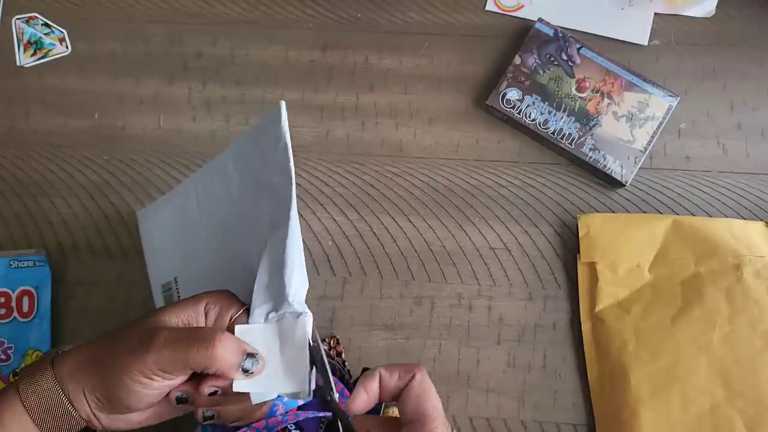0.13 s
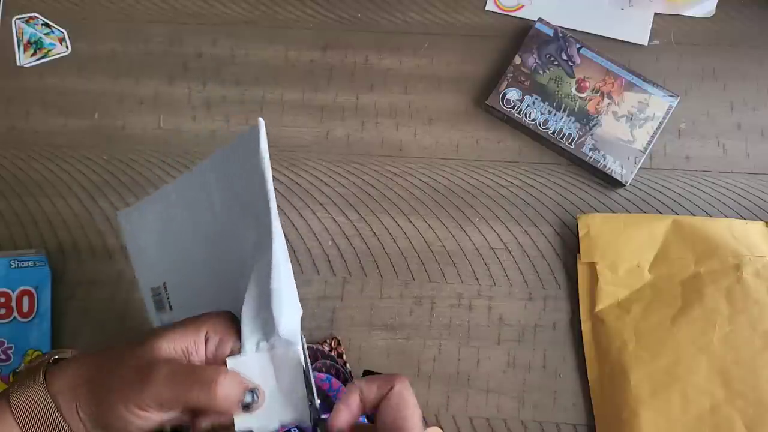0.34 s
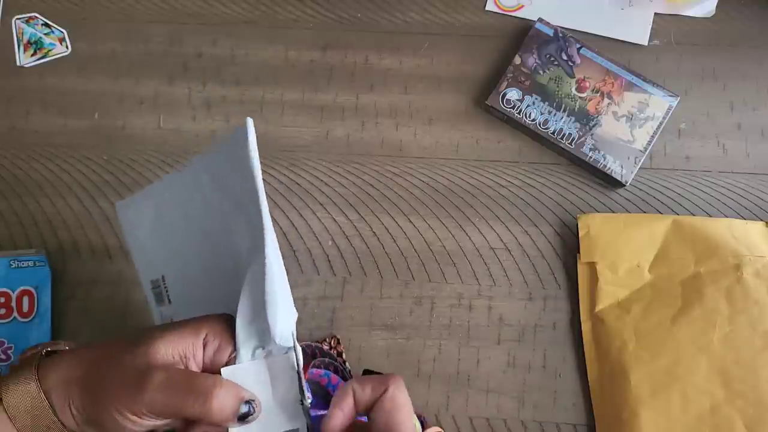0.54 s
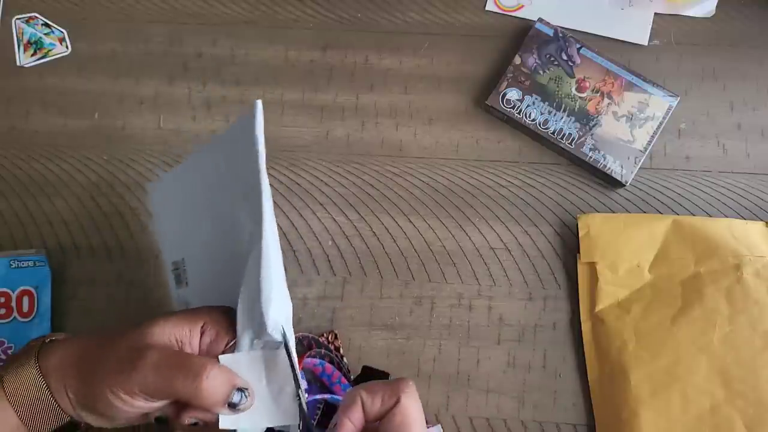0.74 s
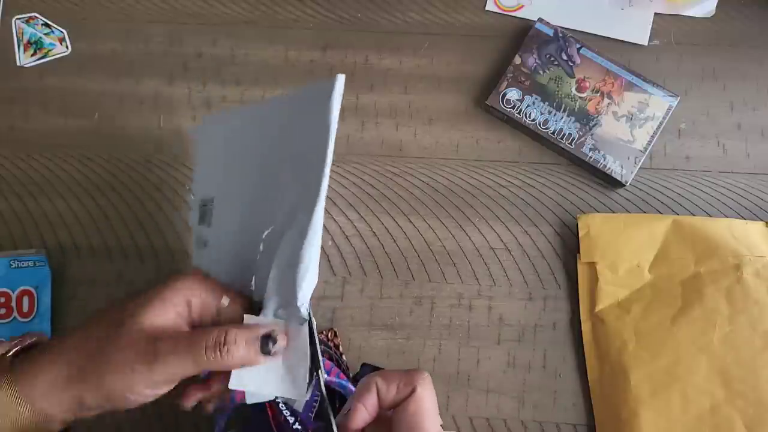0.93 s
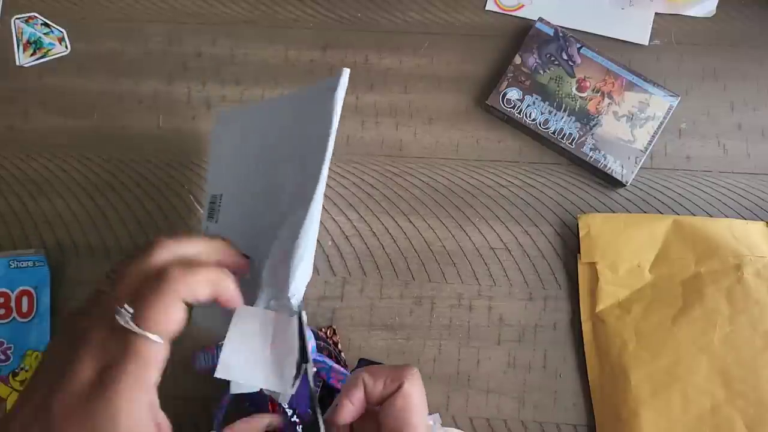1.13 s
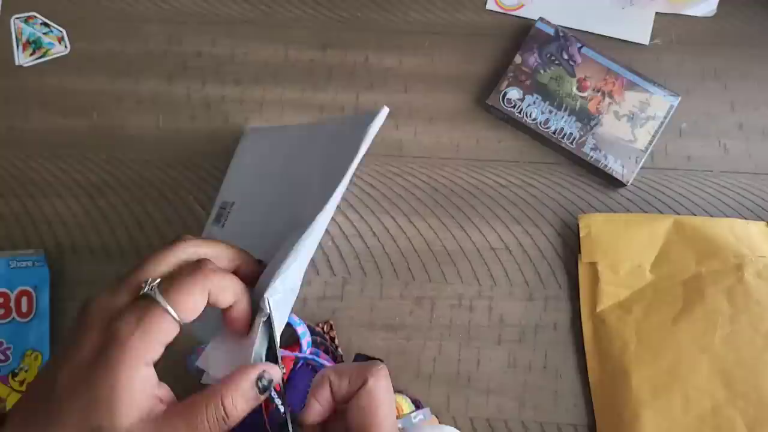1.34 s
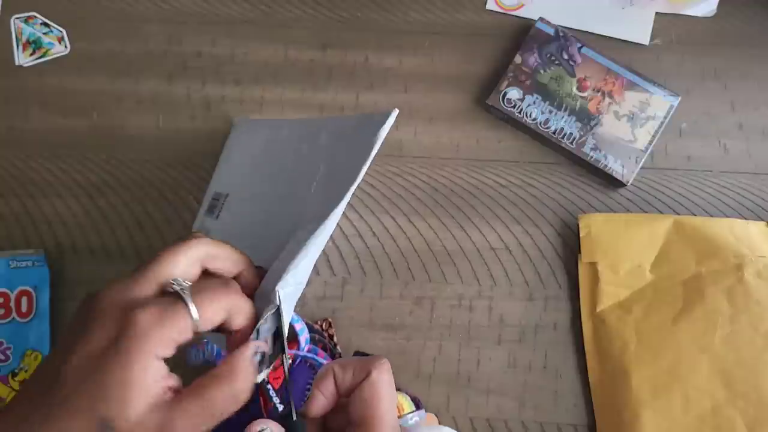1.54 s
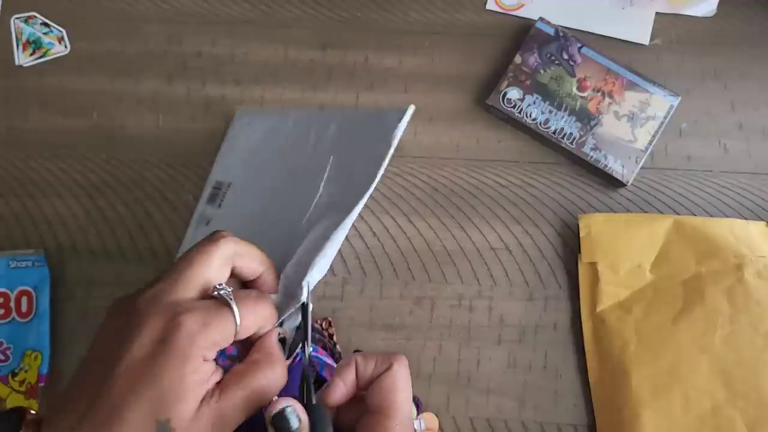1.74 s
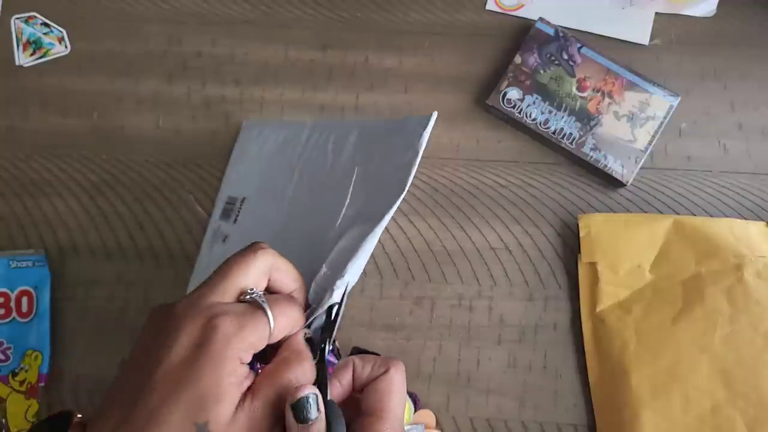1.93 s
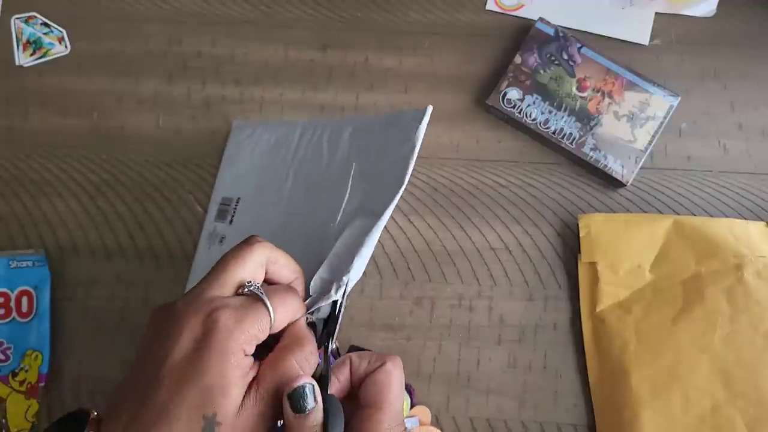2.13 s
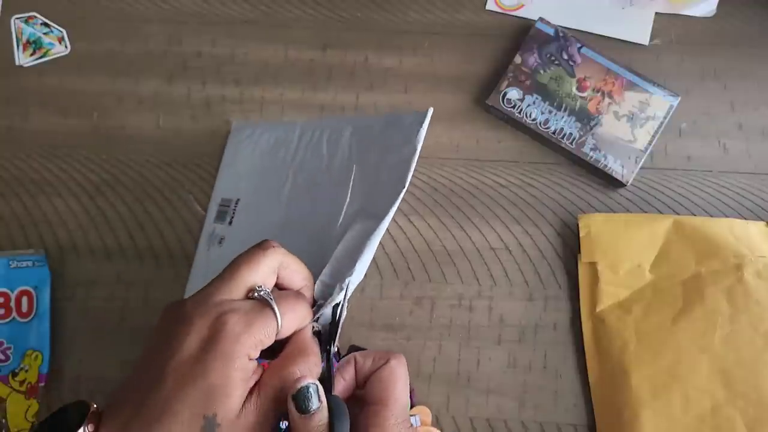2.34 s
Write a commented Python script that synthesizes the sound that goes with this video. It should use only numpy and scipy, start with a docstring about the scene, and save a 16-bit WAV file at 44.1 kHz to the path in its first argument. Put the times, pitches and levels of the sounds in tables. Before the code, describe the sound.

A plastic envelope crackles and snaps close up as scissors snip along its edge.

```python
"""Sharp plastic snaps and a fine crackle, close up: scissors cutting the edge of a padded mailer.
The film buckles and pops, and each snap rings the hollow envelope. Between snaps it slides against
blades and fingers; the padding rubs and knocks dully, and late on the blades clack as they close.
A small room with a low hum answers."""
import sys
import numpy as np
from scipy import signal
from scipy.fft import rfft, irfft
from scipy.io import wavfile
from scipy.ndimage import uniform_filter1d

SR = 44100
rng = np.random.default_rng(int(sys.argv[2]) if len(sys.argv) > 2 else 0)


def waveform_to_disk(signal):
    """Save audio, clipped to [-1, 1], as 16-bit WAV at the path in sys.argv[1]."""
    frames = np.transpose(np.atleast_2d(signal))
    scaled = np.clip(frames, -1, 1) * 32767
    samples = np.round(scaled).astype(np.int16)
    wavfile.write(sys.argv[1], SR, samples)


N = 105840
LEAD_S = 0.006  # pre-roll ahead of each snap and clack
ATTACK_SAMPLES = 135  # the first 3 ms of a hit set its level


def amp(db):
    """Decibels to gain."""
    return 10 ** (np.asarray(db) / 20)


def unit(x):
    """Scales to rms 1."""
    return x / np.sqrt(np.mean(x ** 2) + 1e-20)


def curve(points, hz):
    """Reads a table on a log-frequency axis."""
    f, value = np.transpose(points)
    return np.interp(np.log(hz + 1), np.log(f + 1), value)


def add(mix, s, sound):
    """Drops a stereo sound into the mix at time s."""
    part = mix[:, max(round(s * SR), 0):][:, :sound.shape[1]]
    part += sound[:, :part.shape[1]]


def pan(lr_db):
    """Left and right gains; positive leans left."""
    return amp(np.array([[lr_db], [-lr_db]]) / 2)


def pair(x, likeness):
    """Narrows two unrelated channels: likeness 0 is wide, 1 is mono."""
    c = np.clip(likeness, -1, 1)
    return np.array([x[0], c * x[0] + np.sqrt(1 - c ** 2) * x[1]])


def colour(x, eq, size=2048):
    """Minimum-phase EQ, so attacks stay crisp."""
    log_gain = np.log(amp(curve(eq, abs(np.fft.fftfreq(size, 1 / SR)))))
    taps = np.fft.ifft(np.exp(np.conj(signal.hilbert(log_gain)))).real
    return signal.fftconvolve(x, taps[None], axes=1)[:, :x.shape[1]]


def resonate(x, hz, width_hz):
    """One resonant peak."""
    return signal.lfilter(*signal.iirpeak(hz, hz / width_hz, SR), x)


def pop(size):
    """One clean pulse after the pre-roll, up to three samples apart left and right."""
    return 1.0 * (np.arange(size) == round(LEAD_S * SR) + rng.integers(0, 4, (2, 1)))


def room_tone(air_db=-63):
    """The bed: low rumble, faint hiss and a steady hum."""
    # spectrum of the air: f/Hz, gain/dB
    air_eq = [(30, -19), (42, -1), (115, -3), (165, -12.5), (400, -14), (1200, -31.5), (3000, -70)]
    # near mono in the bass, wider above: f/Hz, left-right likeness
    air_likeness = [(60, 0.98), (150, 0.93), (400, 0.35)]
    # hum tones: f/Hz, rms level/dB
    hum_tones = [(59.5, -80), (86, -73)]
    hz, t = np.fft.rfftfreq(N, 1 / SR), np.arange(N) / SR
    spectrum = pair(rfft(rng.standard_normal((2, N))), curve(air_likeness, hz))
    air = irfft(spectrum * amp(curve(air_eq, hz)), N)
    hum = sum(amp(db) * np.sqrt(2) * np.sin(2 * np.pi * (f * t + rng.random())) for f, db in hum_tones)
    return amp(air_db) * unit(air) + hum


def room_tail(x, wet_db=-8, predelay_samples=130, size=16384):
    """The small room returns a short diffuse tail, treble dying first."""
    # reverb time: f/Hz, T60/s
    decay = [(400, 0.12), (1700, 0.087), (12000, 0.034)]
    reflections = rng.standard_normal((2, size)) * (np.arange(size) > predelay_samples)
    hz, t, spectra = signal.stft(reflections, SR, nperseg=256)
    fade = amp(-60 * t / curve(decay, hz)[:, None])
    tail = signal.istft(spectra * fade, SR, nperseg=256)[1]
    return amp(wet_db) * signal.fftconvolve(x, tail / np.linalg.norm(tail[0]), axes=1)[:, :N]


def handling(grip_trim_db=-3, knock_rise_s=0.000067, knock_fade_s=0.0078):
    """Shifts of grip are soft swells of dull rubbing; knocks are short puffs in the same padding."""
    # fingers shift their grip: t/s, length/s, level before trim/dB
    grips = [(0, 0.034, -59.5), (0.545, 0.053, -56), (0.642, 0.16, -57), (1.225, 0.2, -64.5),
             (1.487, 0.086, -61.5), (1.641, 0.33, -63), (2.045, 0.24, -62.5)]
    # scissors and fingers bump the mailer: t/s, level/dB
    knocks = [(0.049, -47), (0.374, -34.5), (0.751, -43.5), (1.293, -48), (1.725, -46.5), (1.8, -47),
              (2.091, -48), (2.178, -48)]
    # muffled tone of the padding: f/Hz, gain/dB
    padding_eq = [(60, -6), (140, -7), (260, -10), (350, 7), (440, 10), (600, -6), (820, 4), (2500, -32)]
    t = np.arange(N) / SR
    swells = sum(amp(db) * np.sqrt(abs(np.sin(np.pi * np.clip((t - s) / length, 0, 1))))
                 for s, length, db in grips)
    puffs = sum(amp(db) * np.clip((t - s) / knock_rise_s, 0, 1) * np.exp(-abs(t - s) / knock_fade_s)
                for s, db in knocks)
    padding = unit(colour(rng.standard_normal((2, N)), padding_eq))
    return (amp(grip_trim_db) * swells + puffs) * padding * pan(lr_db=1.5)


def crackle(per_s, spread_db, likeness):
    """Tiny slips of random time and size, each a grain of stereo noise."""
    slips = amp(spread_db * np.minimum(rng.exponential(1, N), 4)) * (rng.random(N) < per_s / SR)
    grain = np.exp(-np.arange(64) / 14)
    envelope = np.sqrt(np.convolve(slips ** 2, grain ** 2)[:N])
    return pair(rng.standard_normal((2, N)), likeness) * envelope


def flex(x, drift_db, size=512):
    """The colour drifts in random patches as the film bends; returns rms 1."""
    spectra = signal.stft(x, nperseg=size)[2]
    across_bands = uniform_filter1d(rng.standard_normal(spectra.shape[1:]), size=7, axis=0)
    patches = unit(uniform_filter1d(across_bands, size=8, axis=1))
    return unit(signal.istft(spectra * amp(drift_db * patches), nperseg=size)[1][:, :N])


def sliding_film(fizz_trim_db=0.5, rustle_trim_db=-7.5):
    """Film slides over the blades with a bright crackle while the envelope rustles lower down."""
    # fader rides ahead of the trims: t/s, fizz level/dB, rustle level/dB
    rides = [(0, -50.5, -41), (0.029, -61.5, -55.5), (.1, -69, -56.5), (.15, -60, -51.5), (.19, -65.5, -60),
             (0.251, -59, -59.5), (.3, -63, -54), (.36, -53, -50.5), (.44, -52, -49), (.52, -72.5, -60.5),
             (0.566, -59.5, -55), (0.607, -65, -58), (0.647, -53.5, -52), (.71, -50.5, -44),
             (.78, -59, -49), (.81, -59, -53.5), (.93, -55.5, -48.5), (.985, -56.5, -49.5),
             (1.011, -66, -64), (1.06, -79.5, -70.5), (1.183, -83, -71), (1.195, -61.5, -62),
             (1.23, -56.5, -54.5), (1.26, -51, -48), (1.33, -57, -49.5), (1.42, -59, -56.5),
             (1.47, -48.5, -53), (1.56, -57.5, -49), (1.61, -50.5, -53), (1.65, -60, -59), (1.68, -46, -52),
             (1.76, -56, -52.5), (1.81, -58, -50.5), (1.84, -51, -49), (1.9, -52, -59.5), (1.97, -61, -60),
             (2.009, -58, -54), (2.071, -61.5, -67), (2.104, -54.5, -48), (2.17, -61, -52),
             (2.254, -54.5, -54.5), (2.297, -72, -61), (2.316, -59, -52.5), (2.4, -55.5, -54)]
    # bright film on the blades: f/Hz, gain/dB
    fizz_eq = [(1550, -16.5), (3000, 2), (4000, -2), (5100, -2), (6300, 1), (7800, -1), (9300, -4),
               (12000, 2), (14600, 2.5), (15400, -4), (16100, -25.5)]
    # midrange of the envelope: f/Hz, gain/dB
    rustle_eq = [(200, -12), (450, -13.5), (1000, -5), (1400, 2), (1750, -2), (2300, 3.5), (3000, -4),
                 (4000, -5), (6000, -39.5)]
    t = np.arange(N) / SR
    s, fizz_db, rustle_db = np.transpose(rides)
    fizz = colour(crackle(per_s=6000, spread_db=3.8, likeness=0.093), fizz_eq)
    fizz = flex(fizz, drift_db=1.0) * amp(fizz_trim_db + np.interp(t, s, fizz_db))
    rustle = colour(crackle(per_s=1500, spread_db=1.0, likeness=0.14), rustle_eq)
    rustle = flex(rustle, drift_db=2.5) * amp(rustle_trim_db + np.interp(t, s, rustle_db))
    return fizz + rustle * pan(lr_db=2)


def blade_clacks(chatter_db=-12.5, chatter_s=0.0032, bite_db=3, size=2048):
    """The blades meet: a hard click with a bite of ringing steel, then a short chatter."""
    # the blades bite and close: t/s, top edge f/Hz, level/dB
    clacks = [(1.7243, 2550, -50), (1.7272, 2620, -49), (1.797, 1940, -45.5), (2.0934, 5950, -33.5),
              (2.1784, 6100, -42)]
    t, out = np.arange(size) / SR - LEAD_S, np.zeros((2, N))
    for s, top_hz, db in clacks:
        chatter = amp(chatter_db) * (t > 0) * np.exp(-abs(t) / chatter_s) * rng.standard_normal((2, size))
        blow = pop(size) + chatter
        bite = amp(bite_db) * resonate(blow, hz=4400, width_hz=1800)
        band = signal.butter(3, [450, top_hz], "bandpass", fs=SR, output="sos")
        click = signal.sosfilt(band, blow + bite)
        attack = click[:, t > 0][:, :ATTACK_SAMPLES]
        add(out, s - LEAD_S, amp(db) * click / np.sqrt(np.mean(attack ** 2)))
    return out


def pouch_ring(x, ring_db=-29, t60_s=0.05, size=8192):
    """The hollow envelope rings on after each snap."""
    # modes of the envelope: f/Hz, relative level/dB
    modes = [(1216, -16), (1257, -7), (1348, 7), (1421, 0), (1484, -23.5), (2055, -3), (2320, 4)]
    t = np.arange(size) / SR
    ring = sum(amp(db - 60 * t / t60_s) * np.sin(2 * np.pi * hz * t + rng.normal(0, 0.057, (2, 1)))
               for hz, db in modes)
    return amp(ring_db) * signal.fftconvolve(x, ring / np.linalg.norm(ring[0]), axes=1)[:, :N]


def snap(body_hz, levels_db, strain_db=-16.5, strain_s=0.003, rise_s=0.0002,
         pop_db=16, lumpy_db=3.5, size=2048):
    """A crease strains, pops through with its own hollow pitch, then flutters in uneven lumps."""
    # the four layers, thump, body, crack and fizz: low f/Hz, high f/Hz
    bands = [(250, 900), (1050, 3600), (3600, 9000), (9000, 17000)]
    # how each layer dies: burst decay/s, flutter level/dB, flutter decay/s, left-right likeness
    decays = [(0.002, 2.5, 0.0028, 0.13), (0.00063, -2, 0.0025, 0.68), (0.0011, -27.5, 0.0038, 0.89),
              (0.0015, -11, 0.01, 0.18)]
    # tone of the film: f/Hz, gain/dB
    film_eq = [(420, -7), (1050, -3.5), (1400, 5), (1750, -6.5), (2400, -1.5), (3200, -2.5), (3900, -0.5),
               (5200, 1), (6300, 9), (7800, 2), (9200, -10.5), (12000, -1), (15000, -1), (16500, -28)]
    t, out = np.arange(size) / SR - LEAD_S, np.zeros((2, size))
    age = np.maximum(t, 0)
    rise = np.clip(t / rise_s + 0.5, 0, 1)
    strain = amp(strain_db) * np.exp(-abs(t) / strain_s)
    wobble = unit(uniform_filter1d(rng.standard_normal(size), size=60))
    lumps = unit(amp(lumpy_db * wobble))
    pulse = amp(pop_db) * pop(size)
    for k, db in enumerate(levels_db):
        burst_s, flutter_db, flutter_s, likeness = decays[k]
        flutter = amp(flutter_db) * lumps * np.exp(-age / flutter_s)
        envelope = strain + rise * (np.exp(-age / burst_s) + flutter)
        burst = pair(rng.standard_normal((2, size)), likeness) * envelope
        band = signal.butter(3, bands[k], "bandpass", fs=SR, output="sos")
        layer = signal.sosfilt(band, colour(burst + pulse, film_eq))
        if k == 1:  # the body carries the pitch
            layer = resonate(layer, body_hz, width_hz=930)
        attack = layer[:, t > 0][:, :ATTACK_SAMPLES]
        out += amp(db) * layer / np.sqrt(np.mean(attack ** 2, axis=1, keepdims=True))
    return out


def film_snaps(thump_below_db=18):
    """The film gives in clusters of snaps, each with a soft push of air under its body."""
    # creases giving way: t/s, body f/Hz, body level/dB, crack level/dB, fizz level/dB
    cues = [(0.0483, 2260, -36.5, -51, -49), (0.1153, 2410, -52, -56, -43.5), (0.138, 1930, -40, -56, -46),
            (0.177, 3400, -50.5, -59.5, -72), (0.2146, 2900, -41.5, -54, -36),
            (0.278, 2680, -45, -55, -46.5), (0.3735, 2060, -32, -53, -36.5), (0.3764, 1960, -35, -59, -57),
            (0.3837, 1520, -43.5, -48, -43), (0.3968, 2700, -32.5, -46, -32),
            (0.403, 1970, -30, -32, -24.5), (0.411, 2400, -42, -44, -39), (0.4145, 1500, -40, -55, -51),
            (0.4177, 1500, -40, -55, -51), (0.425, 1630, -38.5, -54, -49), (0.4288, 1680, -36, -52, -48),
            (0.4338, 1890, -35.5, -43, -46), (0.4405, 1900, -32, -41, -44), (0.6235, 2020, -41, -53, -45),
            (0.7233, 2180, -36.5, -56, -37.5), (0.754, 2090, -36, -42.5, -42),
            (0.7642, 1400, -37.5, -70, -56), (0.7735, 2580, -39, -43, -36), (0.828, 2750, -38.5, -42, -39),
            (0.8325, 2700, -47, -51, -48), (0.8715, 1700, -43, -52.5, -50), (0.8834, 1330, -45, -58, -54),
            (0.9571, 2470, -38, -44.5, -39), (0.9773, 2150, -46.5, -53, -63),
            (1.0345, 2500, -62, -60.5, -59.5), (1.1395, 2370, -84, -72, -61),
            (1.1891, 1670, -50.5, -72.5, -56.5), (1.2086, 2230, -50.5, -51, -48.5),
            (1.4651, 1830, -46.5, -51, -47.5), (1.5224, 2460, -44.5, -51, -43),
            (1.5924, 1770, -48, -52, -61), (1.6237, 2870, -46, -56, -39), (1.6287, 2850, -41, -41, -36),
            (1.6626, 2200, -37.5, -43.5, -38.5), (1.773, 3130, -43, -49, -43.5),
            (1.8264, 2280, -58, -41.5, -47.5), (1.8727, 2050, -44, -46.5, -39.5),
            (1.9896, 3430, -46, -43.5, -42.5), (2.221, 1830, -46, -75, -73), (2.245, 2400, -52.5, -53, -45),
            (2.3404, 2900, -55, -47, -43.5)]
    # pan as the mailer turns: t/s, left over right/dB
    pan_path = [(.1, 1), (1.7, 3), (1.95, -0.5)]
    out = np.zeros((2, N))
    for s, body_hz, body_db, crack_db, fizz_db in cues:
        hit = snap(body_hz, [body_db - thump_below_db, body_db, crack_db, fizz_db])
        add(out, s - LEAD_S, hit * pan(np.interp(s, *np.transpose(pan_path))))
    return out


def scene():
    """Mailer and scissors up front, the small room behind."""
    snaps = film_snaps()
    mailer = snaps + pouch_ring(snaps) + sliding_film() + blade_clacks() + handling()
    return mailer + room_tail(mailer) + room_tone()


def record(dry):
    """A steep low-pass at 16.5 kHz trims the very top of the mix."""
    lowpass = signal.firwin(255, 16500, window=("kaiser", 9), fs=SR)
    return signal.oaconvolve(dry, lowpass[None], "same")


dry = scene()
out = record(dry)
waveform_to_disk(out)
```